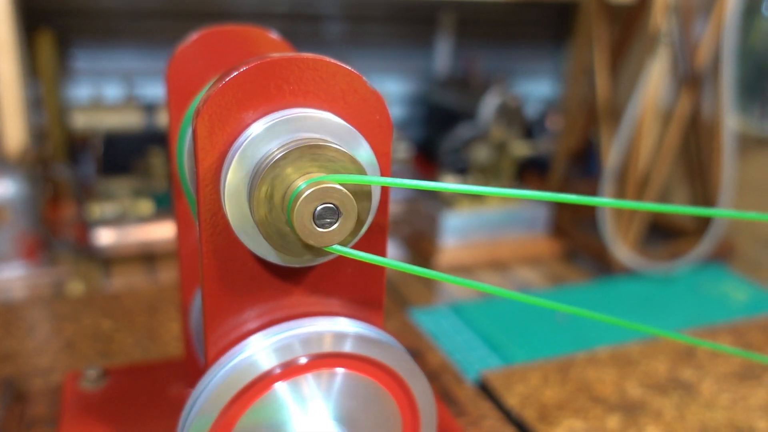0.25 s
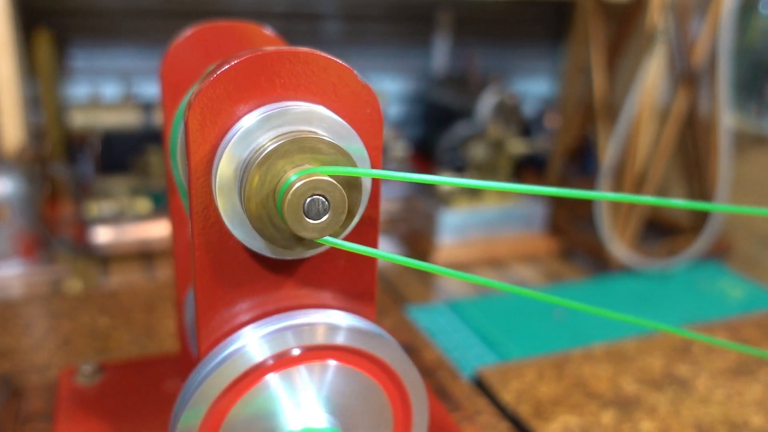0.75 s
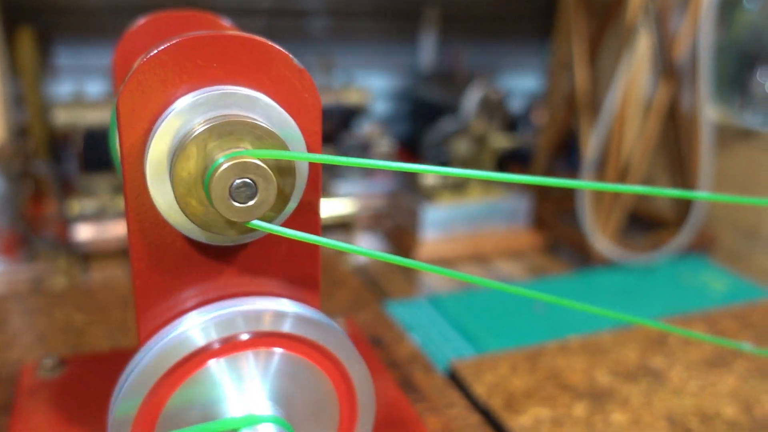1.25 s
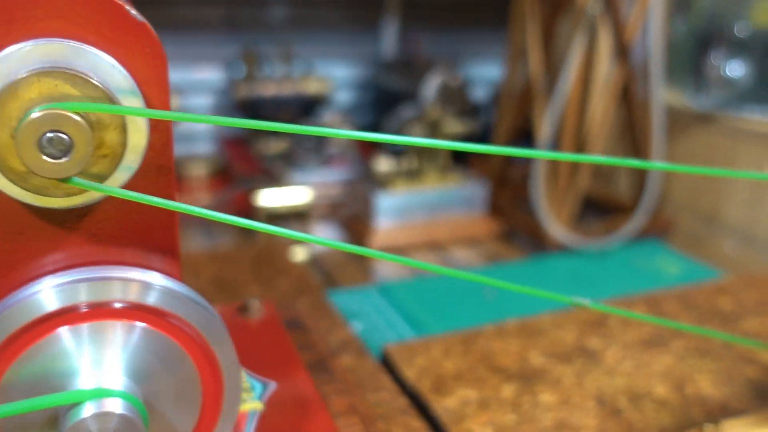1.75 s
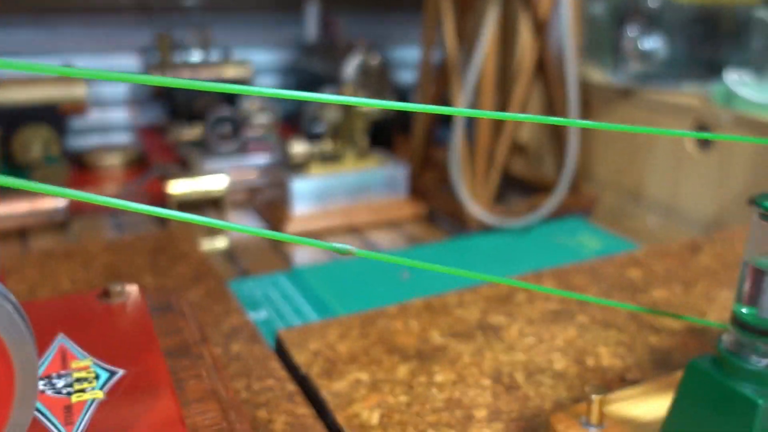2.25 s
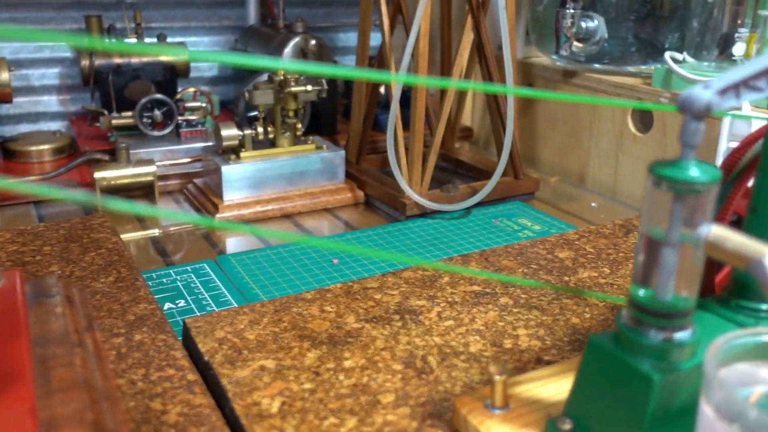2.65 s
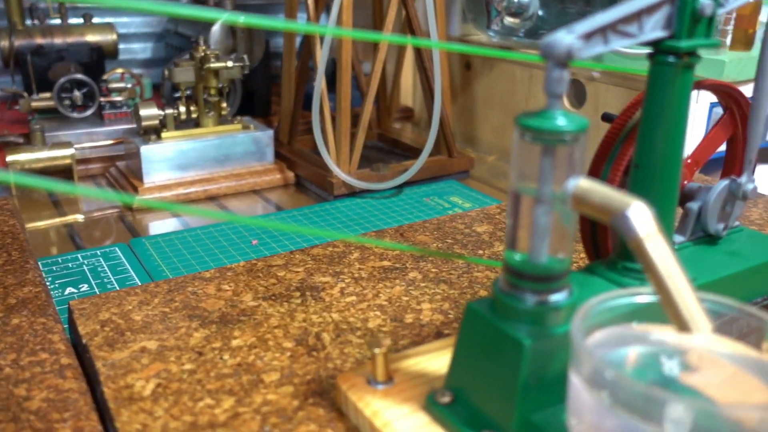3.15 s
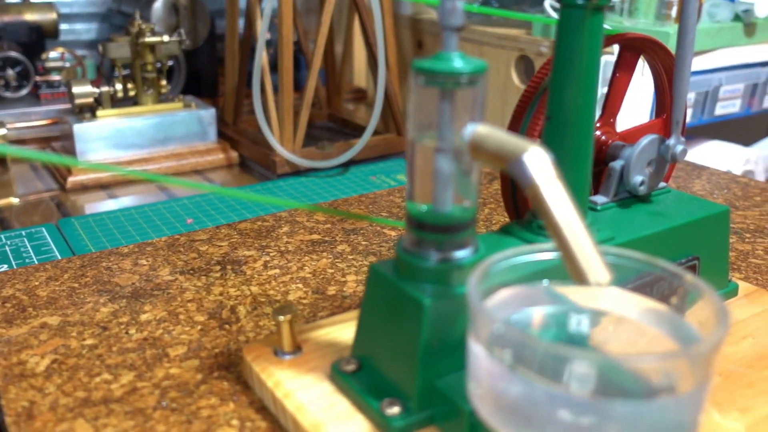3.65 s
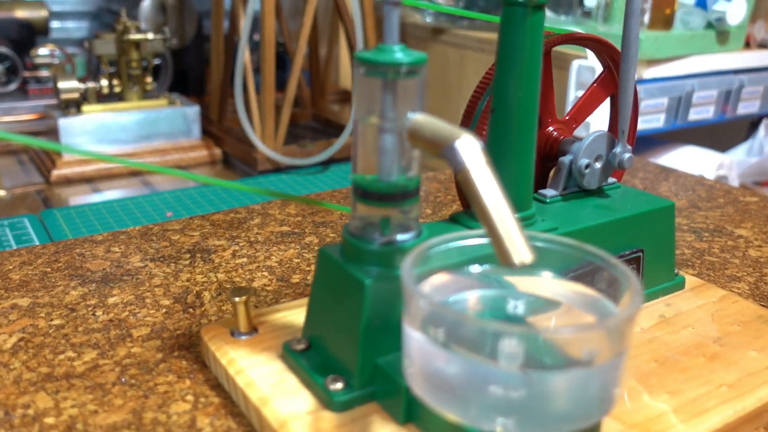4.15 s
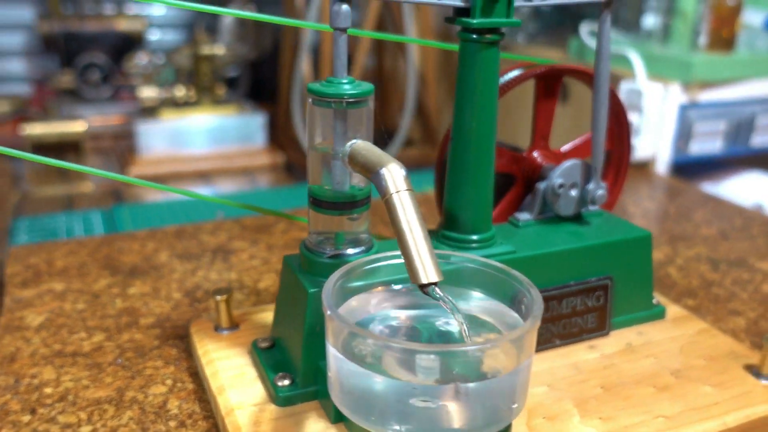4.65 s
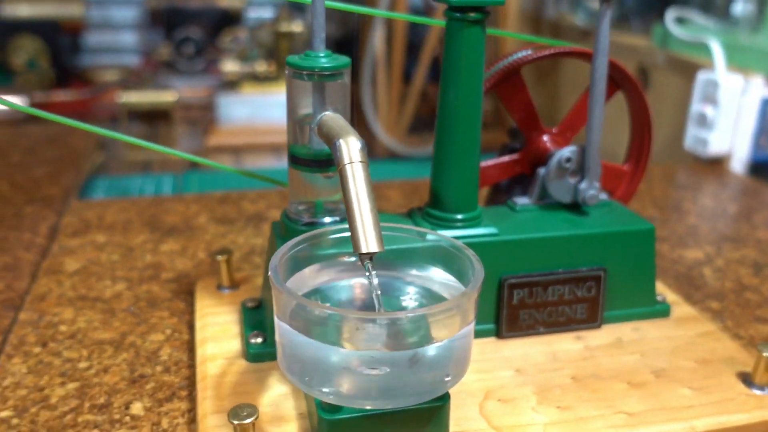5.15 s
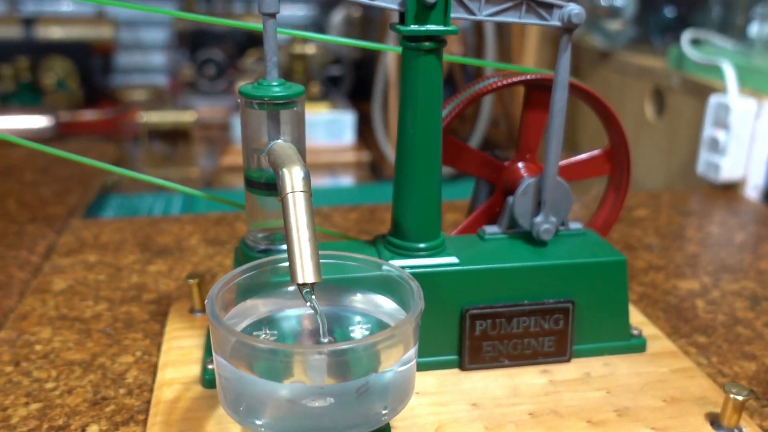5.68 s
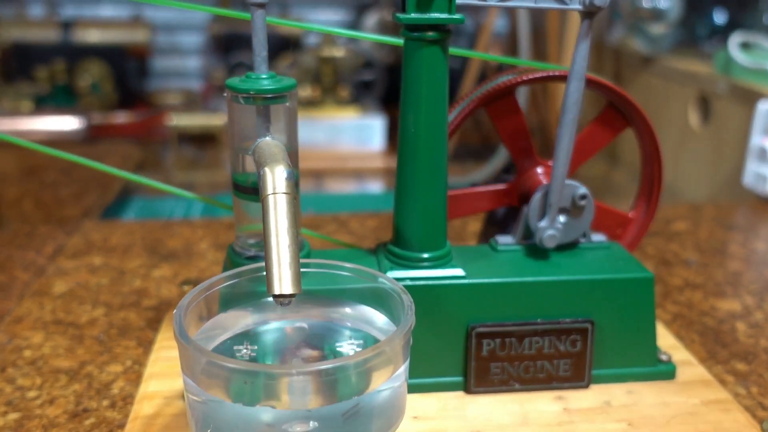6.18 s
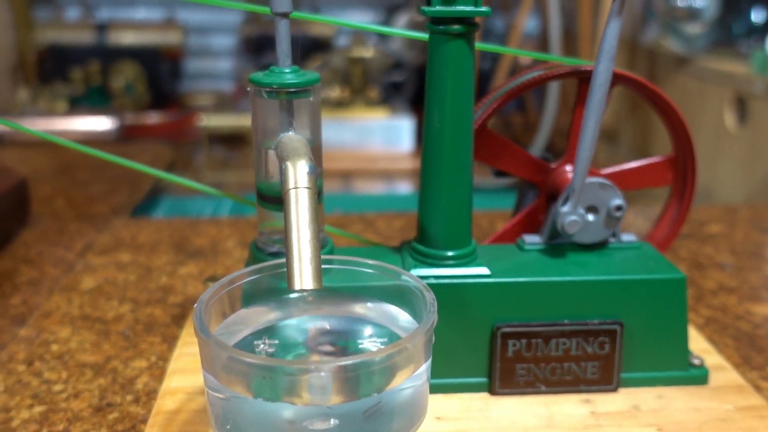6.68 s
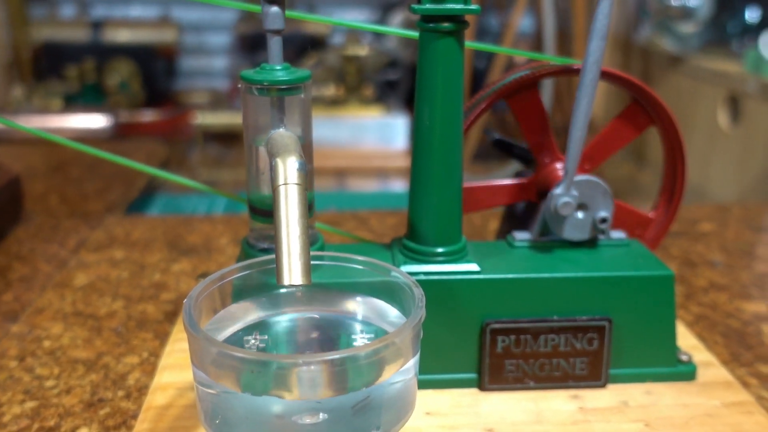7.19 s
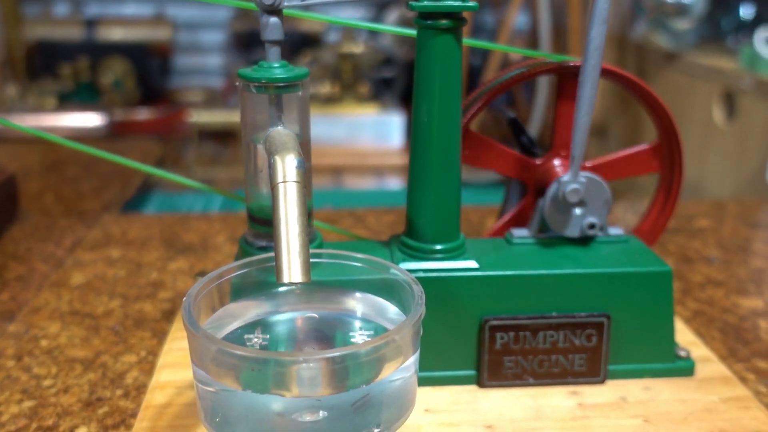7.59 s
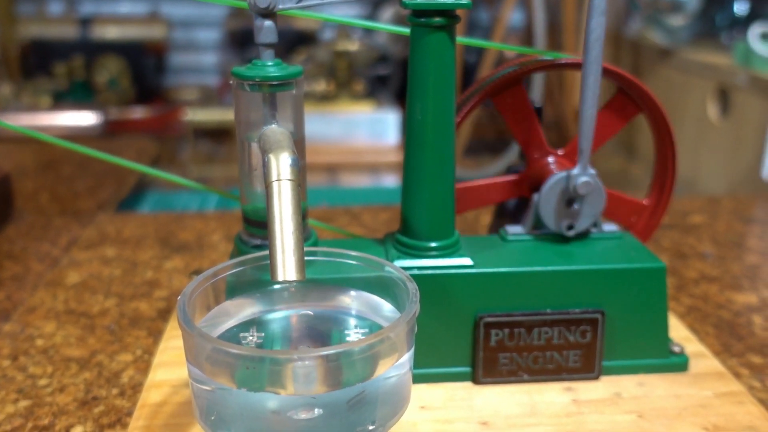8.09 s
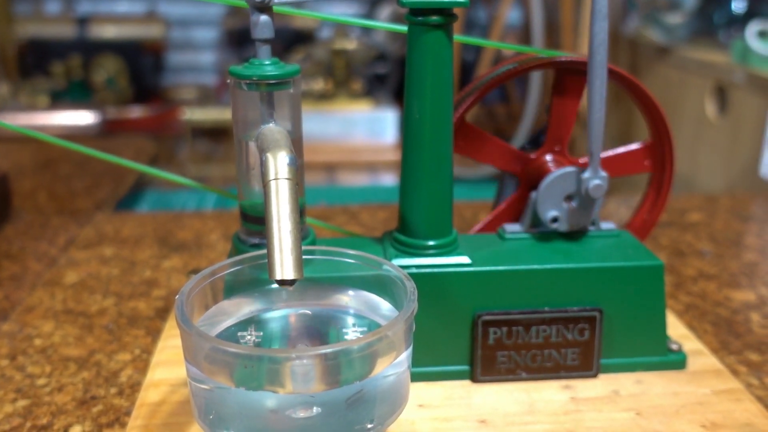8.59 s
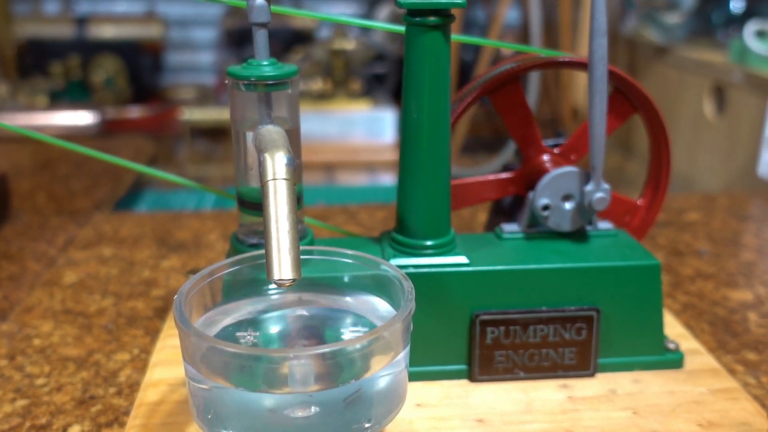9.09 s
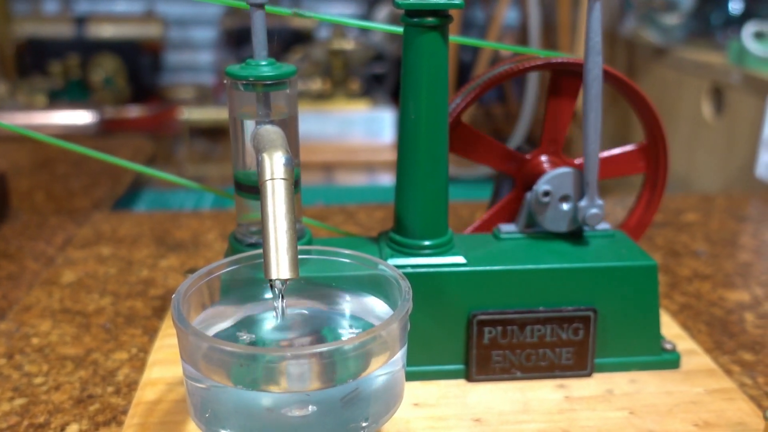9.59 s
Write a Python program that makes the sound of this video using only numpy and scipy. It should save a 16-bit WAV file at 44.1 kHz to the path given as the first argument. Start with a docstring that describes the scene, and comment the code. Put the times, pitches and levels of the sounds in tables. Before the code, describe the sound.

A small model steam engine chuffs fast and steadily, about fourteen hissy puffs a second, with dry bearing knocks, heard close in a workshop.

```python
"""A workshop bench: a model steam engine runs at about seven turns a second, belted to a small pump.
The double-acting cylinder chuffs twice a turn: sputtering noise shaped by chimney, exhaust pipe and steam jet.
The crank bearing knocks once a turn as filtered impulses, and the base thumps with it as decaying sines.
Gears hum and the room rumbles faintly beneath. The microphone drifts from the pulley stand over to the pump."""
import sys
import numpy as np
from scipy import signal
from scipy.fft import rfft, irfft, next_fast_len
from scipy.io import wavfile
from scipy.ndimage import uniform_filter1d, map_coordinates

SR = 44100
rng = np.random.default_rng(int(sys.argv[2]) if len(sys.argv) > 2 else 0)


def unload_audio(sound):
    """Save the sound as a 16-bit wav file, at the path given as the first command line argument."""
    columns = np.transpose(np.atleast_2d(sound))
    # keep every value between -1 and 1, then stretch to whole-number steps
    steps = np.round(np.clip(columns, -1, 1) * 32767)
    wavfile.write(sys.argv[1], SR, steps.astype(np.int16))


N = 433503
TIME = np.arange(N) / SR  # seconds
SIZE = 8192  # length of filters and decays, samples
HZ = np.fft.rfftfreq(SIZE, 1 / SR) + 1  # 1 Hz up, to keep logarithms finite

# path of the microphone: (time [s], position [0 at the pulley stand, 1 at the pump])
MICROPHONE_PATH = [(0, 0), (2.2, 0.057), (2.7, 0.4), (4.2, 0.94), (5.8, 0.99), (9.83, 0.97)]


def amp(db):
    """Decibels to gain."""
    return 10 ** (np.asarray(db) / 20)


def unit(x):
    """Scale so that the middle of the stereo image has rms 1."""
    return x / np.atleast_2d(x).mean(axis=0).std()


def curves(rows):
    """One value per sample for each column after the time."""
    s, *cols = np.transpose(rows)
    return [np.interp(TIME, s, c) for c in cols]


def spectra(rows):
    """One value per frequency for each column after the frequency, interpolated along log frequency."""
    f, *cols = np.transpose(rows)
    return np.array([np.interp(np.log(HZ), np.log(f), c) for c in cols])


def wobble(rate):
    """A smooth random curve, rate knots a second."""
    knots = rng.standard_normal(int(N * rate / SR) + 4)
    return map_coordinates(knots, [TIME * rate], order=2)


def resonances(modes):
    """Gain of steep-sided resonances summed by energy, one row for each level column."""
    f, width, *levels = np.transpose(modes)[:, :, None]
    peaks = 1 / (1 + ((HZ ** 2 - f ** 2) / (HZ * width)) ** 2)
    return np.sqrt(np.sum((amp(levels) * peaks) ** 2, axis=1))


def band(low_hz, high_hz, order):
    """Gain of a steep pass band."""
    low_side = 1 + (low_hz / HZ) ** order
    high_side = 1 + (HZ / high_hz) ** order
    return 1 / np.sqrt(low_side * high_side)


def colour(x, gain):
    """Causal minimum-phase filter with the given gain, by folding its cepstrum."""
    cepstrum = irfft(np.log(np.maximum(gain, 1e-6)))
    cepstrum[1:SIZE // 2] *= 2
    cepstrum[SIZE // 2 + 1:] = 0
    response = irfft(np.exp(rfft(cepstrum)))[:SIZE // 2]
    return signal.oaconvolve(x, response)[:N]


def even(response):
    """Level out the peaks and dips of a response along frequency, keeping its phase."""
    return response / np.sqrt(uniform_filter1d(np.abs(response) ** 2, size=24, axis=1))


def bench(x, t60):
    """Direct sound plus decaying scatter from bench and shelves, different at each microphone port."""
    # the two ports: (frequency [Hz], direct share of the energy [0-1], left over right [dB])
    ports = [(60, 0.84, -2), (150, 1, 0), (380, 0.98, 0), (750, 0.97, 2.5), (1160, 0.8, 3.5),
             (2170, 0.59, 3), (3020, 0.65, 4), (4600, 0.47, -0.5), (7000, 0.31, 1), (11000, .25, 0.5),
             (15500, 0.5, -1)]
    # the left port is nearer the engine: (frequency [Hz], lead of the direct sound [rad])
    left_lead = [(700, 0), (2000, .2), (3000, .7), (4000, 1.3), (5200, 2.6), (7000, 3.4), (9500, 3.6),
                 (11500, 5.8), (15500, 7.3)]
    share, balance_db = spectra(ports)
    sides = np.array([[.5], [-.5]])
    t = np.arange(SIZE) / SR
    decay = np.exp(-np.log(1000) * t / t60)
    scatter = rfft(rng.standard_normal((2, SIZE)) * decay)
    direct = np.sqrt(share) * np.exp(1j * sides * spectra(left_lead))
    paths = even(direct + np.sqrt(1 - share) * even(scatter))
    early = 512  # samples of room for the part that leads
    answer = np.roll(irfft(paths * amp(sides * balance_db)), early, axis=1)
    return signal.oaconvolve(x[None], answer, axes=1)[:, early:early + N]


def nearness(levels_db):
    """Gain of a part as the microphone moves from the pulley stand to the pump, mixed by energy."""
    stand_db, pump_db = levels_db
    place = curves(MICROPHONE_PATH)[0]
    return np.sqrt((1 - place) * amp(stand_db) ** 2 + place * amp(pump_db) ** 2)


def crank_turns():
    """Crank angle in turns, whole at each dead centre; the speed holds for seconds at a time."""
    # steps of speed: (start time [s], speed [turns/s])
    speed_steps = [(0, 6.859), (2.32, 6.922), (8.1, 6.987)]
    since, speed = np.transpose(speed_steps)
    turns = np.cumsum(speed[np.searchsorted(since, TIME, side="right") - 1]) / SR
    first_s = 0.1346
    return turns - np.interp(first_s, TIME, turns)


def strokes(turns, opens, rise, empty, scatter_db):
    """Once a turn the valve uncovers a port; the piston pushes the steam out until the port closes."""
    count, age = np.divmod(turns - opens + 1, 1)
    sizes = amp(scatter_db * rng.standard_normal(int(turns[-1]) + 4))
    size = sizes[count.astype(int)]
    rising = 1 - np.exp(-(age / rise) ** 2)
    emptying = np.exp(-(age / empty) ** 2.8)
    return size * rising * emptying


def steam(turns, gains, opens, puff, sputter_db, scatter_db, diffuse_db, stand_pan_db, t60, falloff,
          back_db=0.25, back_longer=0.034):
    """Noise in the puffs of both strokes over a steady leak, heard through the gains of the two places."""
    rise, empty, leak_db = puff
    out = strokes(turns, opens[0], rise, empty, scatter_db)
    # the valve is set a little unevenly: the backstroke blows longer and harder
    back = amp(back_db) * strokes(turns, opens[1], rise, empty + back_longer, scatter_db)
    # drops of condensate make the flow sputter
    sputter = amp(sputter_db * wobble(rate=200))
    flow = np.sqrt(out ** 2 + back ** 2 + amp(leak_db) ** 2) * sputter

    def rush(gain):
        """Fresh turbulent noise carried by the flow."""
        return colour(flow * rng.standard_normal(N), gain)

    def heard(gain):
        """The rush over the bench, plus the spreading plume that reaches the two ports unrelated."""
        plume = np.array([rush(gain), rush(gain)])
        return unit(bench(rush(gain), t60) + amp(diffuse_db) * plume)

    # the larger the falloff, the sooner the colour of the pulley stand is left behind
    at_stand = (1 - curves(MICROPHONE_PATH)[0]) ** falloff
    stand = amp([[stand_pan_db / 2], [-stand_pan_db / 2]]) * heard(gains[0])
    return np.sqrt(at_stand) * stand + np.sqrt(1 - at_stand) * heard(gains[1])


def chimney(valve):
    """The puffs sound the low resonances of the chimney."""
    # (frequency [Hz], width [Hz], relative level at the stand [dB], relative level at the pump [dB])
    chimney_modes = [(622, 113, -13, -14), (703.4, 74, -2, -3.5), (743, 83, -25, 1.5),
                     (793.4, 35, 2.5, -28), (841.6, 86, -25, 1), (898, 75, -3.5, -3), (995, 59, -18, -1.5),
                     (1053, 50, -19, 0), (1148, 226, -8.5, -8), (1245, 100, -11.5, -19),
                     (1383, 94, -10.5, -16.5), (1575, 270, -21.5, -17.5)]
    # puff: (rise [turns], emptying on the outstroke [turns], relative leak [dB])
    chuff_puff = (.04, 0.4, -14.5)
    # port opens after dead centre: (outstroke [turns], backstroke [turns])
    chuff_opens = (.062, .568)
    # (level at the stand [dB], level at the pump [dB])
    chimney_db = (-26, -20)
    gains = resonances(chimney_modes) * band(423, 1680, order=14)
    chuffs = steam(valve, gains, chuff_opens, chuff_puff, sputter_db=1.0, scatter_db=0.78,
                   diffuse_db=-23, stand_pan_db=.5, t60=0.24, falloff=0.78)
    return nearness(chimney_db) * chuffs


def pipe(valve):
    """The exhaust pipe rings with the puffs; its lowest ring fades as the microphone swings across."""
    # (frequency [Hz], width [Hz], relative level at the stand [dB], relative level at the pump [dB])
    pipe_modes = [(2102, 234, -8.5, -19), (2123, 93, 1, -31), (2205, 300, -10.5, -5.5),
                  (2266.5, 37, -15, 3), (2357, 300, -8, -16), (2420, 37, -9, -4), (2591, 264, -14.5, -7.5),
                  (2683, 65, -5.5, -31), (2860, 210, -38, -15.5), (3075, 206, -15.5, -12),
                  (3290, 175, -20, -10.5), (3430, 280, -12, -25), (3564, 148, -6, -7.5),
                  (3784, 110, -7.5, -8.5), (3776, 133, -3.5, -6), (3935, 270, -24, -7),
                  (3930, 260, -13, -21), (4585, 410, -33, -9), (4620, 280, -4, -9), (4716, 247, -5, -0.5),
                  (4760, 210, -5, -31), (5040, 130, -16, -2), (5025, 350, -7.5, -31), (5250, 480, -17, -6)]
    # puff: (rise [turns], emptying on the outstroke [turns], relative leak [dB])
    blast_puff = (0.043, 0.38, -10)
    # port opens after dead centre: (outstroke [turns], backstroke [turns])
    blast_opens = (.08, .596)
    # (level at the stand [dB], level at the pump [dB]), before the change to the lowest ring
    pipe_db = (-17, -17.4)
    # change to the lowest ring: (time [s], level [dB])
    ring_level = [(0, .5), (2.25, -0.5), (2.6, -2.5), (4.1, -2.5), (4.8, -0.4), (8.5, 0), (9.4, 1.5)]
    gains = resonances(pipe_modes) * band(1670, 5440, order=40)
    blasts = steam(valve, gains, blast_opens, blast_puff, sputter_db=1.22, scatter_db=0.64,
                   diffuse_db=-8.5, stand_pan_db=2.0, t60=0.11, falloff=1.38)
    low_pass = signal.butter(4, 2500, fs=SR, output="sos")
    ring = signal.sosfiltfilt(low_pass, blasts)
    blasts = blasts + (amp(curves(ring_level)[0]) - 1) * ring
    return nearness(pipe_db) * blasts


def jet(valve):
    """The steam jet hisses at high frequency, with the strongest leak between puffs."""
    # (frequency [Hz], relative level at the stand [dB], relative level at the pump [dB])
    jet_spectrum = [(4530, -49, -43), (5930, -7, -10.5), (6420, 0.5, 2), (6590, -5.5, 2.5),
                    (7800, -2.5, -2.5), (8590, -10, -4), (8760, 6.5, 4.5), (8910, -7, -2), (9700, -9, -5.5),
                    (12000, -8.5, -6.5), (12900, -6.5, -4.5), (13600, -13, -10), (15500, -9, -5.5)]
    # puff: (rise [turns], emptying on the outstroke [turns], relative leak [dB])
    hiss_puff = (0.054, 0.36, -6.5)
    # port opens after dead centre: (outstroke [turns], backstroke [turns])
    hiss_opens = (.09, .606)
    # (level at the stand [dB], level at the pump [dB])
    hiss_db = (-24.5, -22.6)
    hiss = steam(valve, amp(spectra(jet_spectrum)), hiss_opens, hiss_puff, sputter_db=2.0, scatter_db=0.92,
                 diffuse_db=-3, stand_pan_db=-0.5, t60=0.096, falloff=1.3)
    return nearness(hiss_db) * hiss


def exhaust(turns):
    """In each puff the chimney chuffs first, then the pipe rings and the jet hisses."""
    # the valve runs a little late at first, then settles: (time [s], lag [turns])
    valve_lag = [(1.5, .03), (3.5, .01), (6, 0)]
    valve = turns - curves(valve_lag)[0]
    return chimney(valve) + pipe(valve) + jet(valve)


def gears(hum_hz=225, level_db=-64, drift=0.99):
    """The gear train hums faintly as a sine whose phase wanders (drift in radians)."""
    phase = 2 * np.pi * hum_hz * TIME + drift * wobble(rate=12)
    return amp(level_db) * unit(np.sin(phase))


def workshop(level_db=-53):
    """Faint rumble of belt, gears and room: steady filtered noise."""
    # (frequency [Hz], relative level [dB per Hz])
    rumble_spectrum = [(20, -7), (80, -6.5), (130, 2), (222, 1), (280, 8.5), (350, 12), (480, 14),
                       (1500, -24)]
    rumble = colour(rng.standard_normal(N), amp(spectra(rumble_spectrum)[0]))
    return amp(level_db) * unit(bench(rumble, t60=.2))


def dead_centres(turns):
    """The moments in seconds at which the crank completes a turn."""
    return np.interp(np.arange(int(turns[-1]) + 1), turns, TIME)


def blows(times, db):
    """One impulse at each of the times."""
    samples = np.clip(times * SR, 0, N).astype(int)
    return np.bincount(samples, amp(db), N + 1)[:N]


def knock(turns, blow_db=14, delay_s=0.00102, rebound_s=0.00347, rebound_db=-5, scatter_db=2.5,
          jitter_s=.0007):
    """Once a turn, play in the crank bearing closes with a dry knock and a loose rebound."""
    # the knock comes and goes in spells: (time [s], level before blow_db and scatter [dB])
    knock_level = [(0, -14), (1.85, -12), (2.2, -17), (3.2, -21), (3.33, -11.5), (6.2, -13), (6.4, -25),
                   (6.85, -13), (7.5, -16), (8.1, -14.5), (9.83, -17)]
    # single knocks that stand out: (time [s], level before blow_db [dB])
    hard_knocks = [(.43, -9), (.72, -9), (1.74, -11), (3.48, -7), (3.77, -8), (5.79, -7.5), (8.24, -9.5)]
    # bearing resonances: (frequency [Hz], width [Hz], relative level [dB])
    bearing_modes = [(756, 450, -9), (1240, 105, 5.5), (1443, 170, -1.5), (1810, 89, -5.5),
                     (2200, 960, -23)]
    s = dead_centres(turns)
    db = np.interp(s, *np.transpose(knock_level)) + scatter_db * rng.standard_normal(len(s))
    for at, hard_db in hard_knocks:
        nearest = np.argmin(np.abs(s - at))
        db[nearest] = hard_db
    first = s + delay_s + jitter_s * rng.standard_normal(len(s))
    again = first + rebound_s * rng.uniform(0.48, 1.516, len(s))
    contacts = blows(first, db + blow_db) + blows(again, db + blow_db + rebound_db)
    gain = resonances(bearing_modes)[0]
    return bench(colour(contacts, gain / np.sqrt(np.mean(gain ** 2))), t60=.1)


def base(turns, delay_s=0.0018, scatter_db=1.0):
    """The reversing piston thumps the base once a turn; each mode swells and dies."""
    # modes: (frequency [Hz], relative level [dB], attack [s], t60 [s])
    base_modes = [(124, -25, .015, .2), (165, -22, 0.022, .2), (228, -4, 0.014, 0.12),
                  (339, -6, 0.0026, .06), (425, -6.5, 0.0098, 0.11), (525, 5, 0.0098, 0.065)]
    # loudest beside the pulley stand: (time [s], level [dB])
    base_level = [(0, -50), (1.5, -45.5), (2.6, -50), (4.3, -49), (5, -54.5), (9.83, -55)]
    s = dead_centres(turns)
    t = np.arange(SIZE) / SR
    thumps = np.zeros(N)
    for hz, db, attack, t60 in base_modes:
        swell = 1 - np.exp(-(t / attack) ** 2)
        decay = np.exp(-np.log(1000) * t / t60)
        ring = np.sin(2 * np.pi * hz * t) * swell * decay
        hits = blows(s + delay_s, db + scatter_db * rng.standard_normal(len(s)))
        thumps += signal.oaconvolve(hits, unit(ring))[:N]
    return amp(curves(base_level)[0]) * unit(bench(thumps, t60=.1))


def scene():
    """The crank times the chuffs, knocks and thumps; gears and room lie beneath."""
    turns = crank_turns()
    return exhaust(turns) + knock(turns) + base(turns) + gears() + workshop()


def record(dry):
    """The microphone's recorder rounds off the highest peaks and keeps nothing above its band limit."""
    top_hz = 15780
    held = dry / (1 + (np.abs(dry) / .98) ** 16) ** (1 / 16)
    size = next_fast_len(N + SIZE)
    kept = np.fft.rfftfreq(size, 1 / SR) < top_hz
    return irfft(rfft(held, size) * kept, size)[:, :N]


dry = scene()
out = record(dry)
unload_audio(out)
```